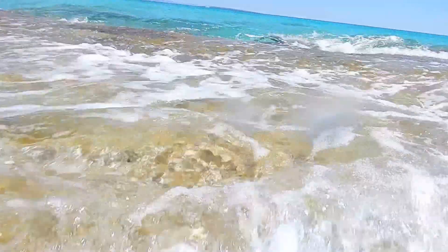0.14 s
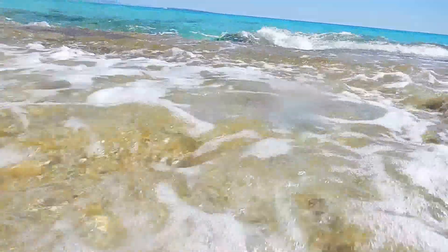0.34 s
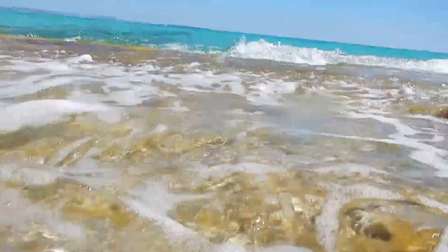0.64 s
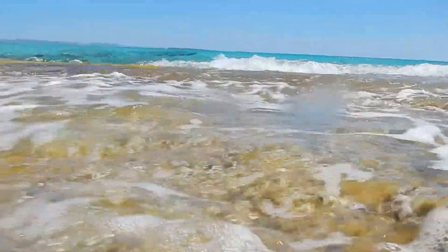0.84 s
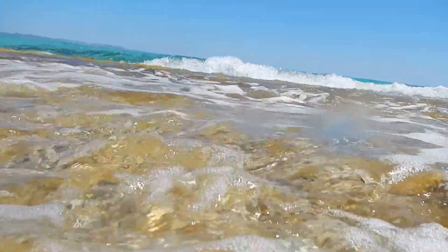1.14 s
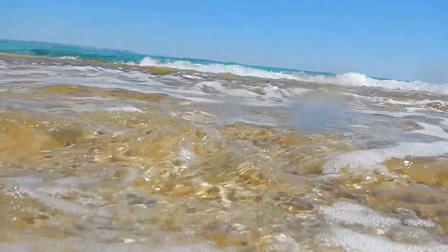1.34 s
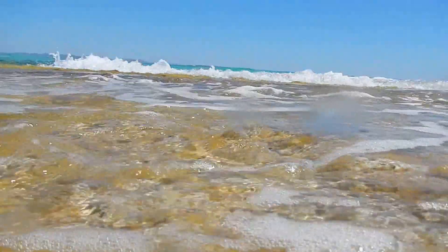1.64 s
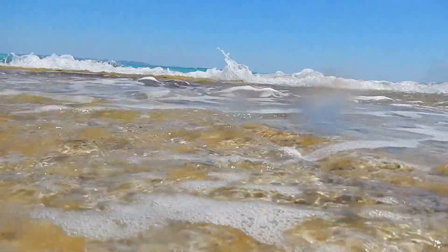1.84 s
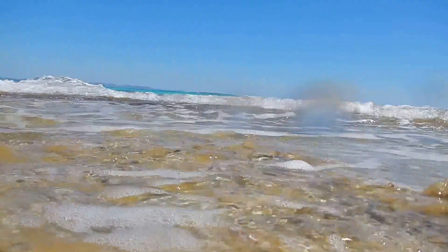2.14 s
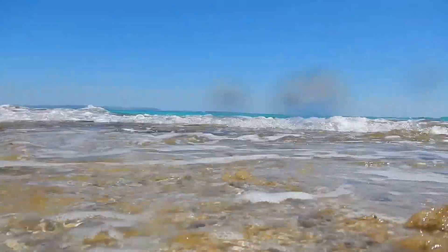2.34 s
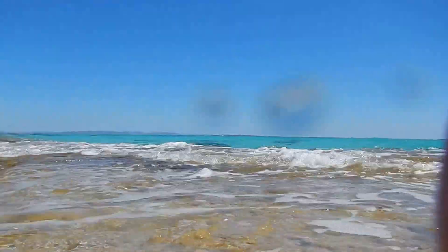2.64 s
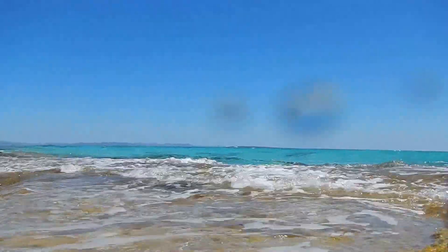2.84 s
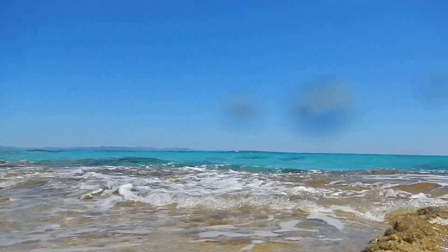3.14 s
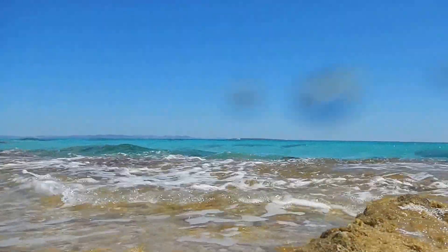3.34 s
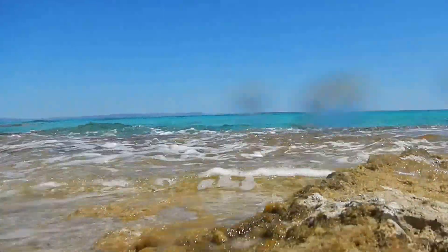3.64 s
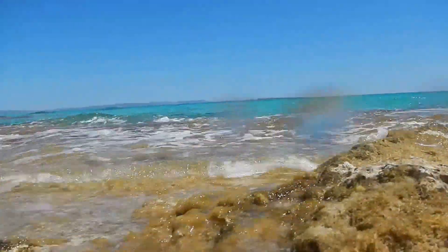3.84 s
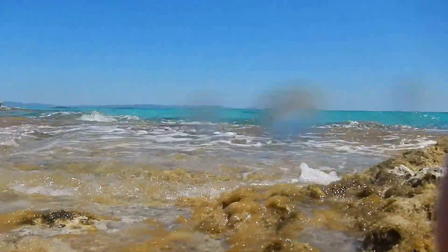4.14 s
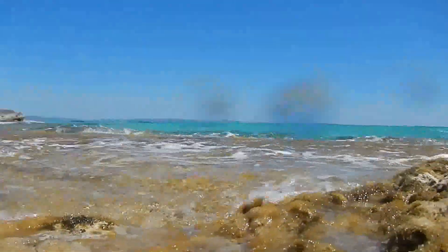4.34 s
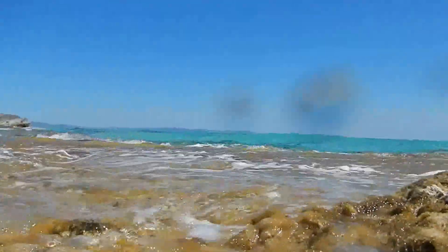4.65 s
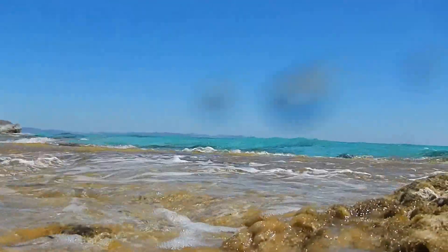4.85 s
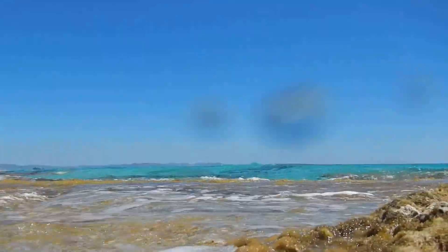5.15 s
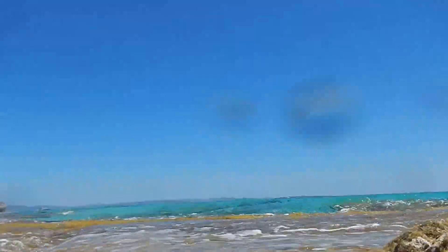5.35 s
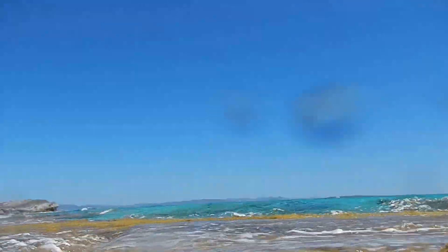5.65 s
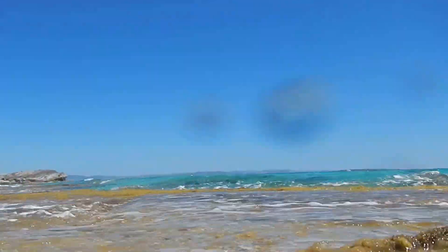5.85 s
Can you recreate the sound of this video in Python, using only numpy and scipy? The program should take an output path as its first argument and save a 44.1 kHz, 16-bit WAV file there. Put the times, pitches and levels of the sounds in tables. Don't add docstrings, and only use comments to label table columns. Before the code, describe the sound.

Small waves wash over a shallow rock shelf, heard from inside a waterproof case that makes everything hollow and boxy, ringing near 1 kHz. Foam fizzes only faintly. Fingers tap and slip on the shell, with a loud cluster near three seconds and another around five. Water plops and gurgles most between 3.8 and 4.9 seconds, while wind rumbles unevenly left and right. The sea dips after loud handling, then swells back.

```python
import sys
import numpy as np
from scipy import signal
from scipy.fft import rfft, irfft, next_fast_len
from scipy.io import wavfile
from scipy.ndimage import uniform_filter1d, map_coordinates

SR = 44100
rng = np.random.default_rng(int(sys.argv[2]) if len(sys.argv) > 2 else 0)


def gain_from_db(level_db):
    decades = np.asarray(level_db, float) / 20
    return 10 ** decades


def output_pcm(signal):
    pcm = np.clip(np.atleast_2d(signal).T, -1, 1) * 32767
    wavfile.write(sys.argv[1], SR, np.round(pcm).astype(np.int16))


N = 265129

# frequency in Hz, level in dB per Hz.
CASE_AIR = [(90, -45), (150, -13), (365, -12), (550, -10), (710, -4), (860, -2), (965, 3), (1100, -4),
            (1490, -20), (1660, -18), (2080, -30.5), (2310, -27.5), (3000, -45.5), (4650, -80.5),
            (9000, -110)]


def unit(x):
    return x / np.sqrt(np.mean(x ** 2) + 1e-20)


def along(points, hz):
    f, v = np.transpose(points)
    return np.interp(np.log(hz + 1), np.log(f + 1), v)


def curves(rows):
    s, *columns = np.transpose(rows)
    return np.array([np.interp(np.arange(N) / SR, s, c) for c in columns])


def wobble(rate, channels=1):
    at = np.arange(N) * rate / SR
    return np.array([map_coordinates(k, [at]) for k in rng.standard_normal((channels, 800))])


def bumps(rows):
    out = np.zeros((len(rows[0]) - 2, N))
    for s, half, *values in rows:
        at = np.arange(max(round((s - half) * SR), 0), min(round((s + half) * SR), N))
        out[:, at] += np.outer(values, np.cos(np.pi / 2 * (at / SR - s) / half) ** 2)
    return out


def window(s):
    start = round(s * SR)
    span = slice(start, min(start + SR // 6, N))
    return span, np.arange(span.start, span.stop) / SR - s


def coloured(x, spectrum, turn=0):
    m = 2 * next_fast_len(N // 2 + 8192)
    hz = np.fft.rfftfreq(m, 1 / SR)
    cepstrum = irfft(np.log(gain_from_db(along(spectrum, hz)) + 1e-7), m)
    cepstrum[1:m // 2] *= 2
    cepstrum[m // 2 + 1:] = 0
    log_response = rfft(cepstrum)
    response = unit(np.exp(log_response.real)) * np.exp(1j * log_response.imag)
    phase = turn(hz) if turn else 0
    return irfft(rfft(x, m) * response * np.exp(1j * phase), m)[..., :N]


def patchy(depth_db):
    z = signal.stft(rng.standard_normal((2, N)), nperseg=256)[2]
    field = uniform_filter1d(rng.standard_normal(z.shape[1:]), size=4, axis=0)
    field = uniform_filter1d(field, size=10, axis=1)
    noise = signal.istft(z * gain_from_db(depth_db * unit(field)), nperseg=256)[1]
    return unit(noise[:, :N])


def pops(rate, spread_db):
    draw = rng.random((2, 3, N))
    bursts = draw[:, 0] < rate / SR
    direction = np.sign(draw[:, 1] - .5)
    size = gain_from_db(-spread_db * np.log(draw[:, 2] + 0.0092))
    return unit(bursts * direction * size)


def ports(pair):
    # frequency in Hz, left-right likeness (1 is identical).
    likeness = [(200, 0.49), (400, 0.14), (700, 0.69), (1000, 0.77), (1500, 0.59), (2300, 0.51),
                (3000, 0.23), (6000, 0.14)]
    m = next_fast_len(N)
    turn = np.arccos(np.clip(along(likeness, np.fft.rfftfreq(m, 1 / SR)), -1, 1)) / 2
    mid, side = irfft(rfft(pair, m) * [np.cos(turn), np.sin(turn)], m)[:, :N]
    return np.array([mid + side, mid - side])


def right_first(lag_s):
    return lambda hz: np.outer([-.5, .5], 2 * np.pi * hz * lag_s)


def gain():
    # start in seconds, level the gain falls to in dB.
    ducks = [(0, -13), (0.751, -13.5), (0.818, -28.5), (1.329, -29), (2.872, -13), (2.998, -12),
             (3.14, -15.5), (3.39, -15), (4.1, -8), (4.713, -3.5), (4.929, -16.5), (5.05, -19), (5.14, -19),
             (5.72, -9)]
    climb_db_per_s, fall_s = 12.5, 0.021
    s, low_db = np.transpose(ducks)
    ends = np.append(s[1:], N / SR)
    high_db = low_db + climb_db_per_s * (ends - s)
    times = np.ravel([s + fall_s, ends], "F")
    return gain_from_db(np.interp(np.arange(N) / SR, times, np.ravel([low_db, high_db], "F")))


def sea():
    # time in seconds, wash level in dB, left over right in dB.
    waves = [(0, -15.5, -0.5), (.4, -11, 1.5), (.62, -12.5, 1), (.75, -7.5, 1.5), (.9, -12.5, 2.5),
             (1.6, -14, 4), (2.1, -14.5, 1.5), (2.7, -14.5, 4.5), (3.1, -13.5, 0.5), (3.4, -19.5, 2),
             (3.7, -17.5, 2.5), (4, -15, 1.5), (4.3, -14, 2.5), (4.85, -16.5, 1), (5.1, -10.5, -2.5),
             (5.4, -17, 0), (5.75, -14.5, 1.5), (6.01, -20, 2)]
    # centre in seconds, half length in seconds, foam swell in dB, gurgle swell in dB.
    surges = [
        (.45, 0.33, 4, -7.5),
        (.74, 0.1, -3.5, 1),
        (1.2, 0.29, 3.5, -4.5),
        (2.1, 0.66, 5.5, -5),
        (2.6, 0.92, 0.5, -1.5),
        (3.75, 0.63, 3.5, 14),
        (4.2, 0.39, 0.5, 8),
        (4.95, 0.4, 4, 5.5),
        (5.85, 0.34, 4, -2.5),
    ]
    # frequency in Hz, level in dB per Hz.
    gurgle_colour = [(200, -23.5), (380, -28), (520, -8), (680, 6.5), (800, 4.5), (950, -24), (2000, -70),
                     (5000, -130)]
    # frequency in Hz, level in dB per Hz.
    foam_colour = [(1500, -20.5), (2500, 11.5), (3000, 2.5), (3600, 3), (4400, -9), (6000, -16.5),
                   (9000, -24), (15000, -37)]
    # frequency in Hz, lead of the left in radians.
    left_lead = [(300, 0.28), (550, 0.3), (1000, 0.38), (1400, 0.42), (2100, -1), (2700, -1.2), (3300, -1),
                 (4500, -6.5)]
    foam_db, foam_fades_db_per_s, gurgle_db = -32.5, 0.96, -14

    def lead(hz):
        return np.outer([.5, -.5], along(left_lead, hz))

    wash_db, pan_db = curves(waves)
    foam_swell_db, hollow_db = bumps(surges)
    fizz_db = wash_db + foam_db - foam_fades_db_per_s * np.arange(N) / SR + foam_swell_db
    slosh_db = 0.51 * wobble(7.6) + 0.53 * wobble(30) + slaps()
    wash = coloured(ports(patchy(1.8) + 0.25 * pops(300, 3.3)), CASE_AIR, lead)
    gurgle = coloured(ports(patchy(1.9) + .5 * pops(150, 2.2)), gurgle_colour, lead)
    fizz = coloured(ports(patchy(2.6) + 0.31 * pops(900, 2.2)), foam_colour, lead)
    water = unit(wash) + gain_from_db(gurgle_db + hollow_db) * unit(gurgle)
    water = gain_from_db(wash_db + slosh_db - 2.5) * water
    fizz = gain_from_db(fizz_db + 0.28 * slosh_db + 0.83 * wobble(24)) * unit(fizz)
    return gain_from_db(np.outer([.5, -.5], pan_db)) * (water + fizz)


def whine():
    tone = np.sin(2 * np.pi * 14835 * np.arange(N) / SR)
    return gain_from_db([[-59], [-65]]) * gain_from_db(.8 * wobble(15)) * tone


def breeze():
    return gain_from_db([[-32], [-26.5]] + 3.5 * wobble(9, channels=2))


def wind(steady):
    # centre in seconds, half length in seconds, left level in dB, right level in dB.
    gusts = [(0.35, 0.09, -43, -35), (0.546, 0.022, -49, -46), (0.733, 0.057, -37, -19),
             (1.06, 0.37, -46.5, -62), (1.54, .12, -43.5, -51), (1.785, 0.026, -44, -52),
             (1.917, 0.034, -48, -37.5), (2.077, .09, -37.5, -54), (2.304, 0.058, -32.5, -38),
             (2.632, 0.2, -48, -29), (2.818, 0.22, -24, -20.5), (3.052, 0.14, -24, -30),
             (3.348, 0.36, -60, -44), (3.603, 0.13, -50, -33.5), (3.797, 0.063, -47.5, -32),
             (3.998, 0.07, -36, -35), (4.115, 0.065, -23, -31), (4.251, 0.1, -20, -33),
             (4.418, 0.12, -19, -27), (4.596, 0.073, -20, -46), (4.768, 0.05, -34, -43.5),
             (4.883, 0.062, -17.5, -36), (5.101, 0.19, -40, -32), (5.504, 0.17, -30, -37.5),
             (5.695, 0.14, -30.5, -28.5), (5.839, 0.045, -22.5, -19), (5.992, 0.18, -32, -23.5)]
    # frequency in Hz, level in dB per Hz.
    rumble_colour = [(15, -4.5), (40, -4), (110, 4), (220, -8.5), (450, -12), (900, -50.5), (2000, -85.5),
                     (5000, -130)]
    # frequency in Hz, level in dB per Hz.
    hiss_colour = [(1500, -41), (4000, -1), (12000, -9), (16000, -23)]
    hiss_db = -53
    lumps = gain_from_db(2.3 * wobble(25, channels=2))
    air = rng.standard_normal((2, N))
    flow = steady + bumps([(s, half, *gain_from_db(db)) for s, half, *db in gusts])
    rumble = unit(lumps * coloured(air - 0.18 * air[::-1], rumble_colour))
    hiss = unit(lumps * coloured(air, hiss_colour))
    return flow * (rumble + gain_from_db(hiss_db) * hiss)


def taps():
    # time in seconds, peak in dB, air ring in dB, nail snap in dB, left over right in dB.
    nail_taps = [(.0137, -15, -9.5, -33.5, 5.5), (.479, -14, -11, -35, 2.5), (.7598, -10.5, 2.5, -35, 5),
                 (.8146, -9.5, 2, -26, -4.5), (1.3316, -32.5, -3.5, -9, -7.5), (1.9607, -36, 0, -20, -1.5),
                 (2.034, -33, -0.5, -25, 3), (2.191, -39.5, 9.5, -13.5, 0.5), (2.2245, -8.5, -5, -37.5, 5),
                 (2.3281, -26, 4.5, -21, 7), (2.484, -22.5, 5.5, -40, -2.5), (2.505, -38, 3.5, -7.5, 3),
                 (2.7077, -30.5, 4.5, -28.5, 5.5), (2.9446, -12, -1.5, -33.5, 3),
                 (3.145, -9, -2, -24, -2.5), (3.3917, -9, -6.5, -26, 0.5), (4.1256, -28.5, 3, -20, 7),
                 (4.4624, -14, -2.5, -21, 0), (4.5405, -31, 0.5, -18.5, 1.5),
                 (4.732, -24.5, 8.5, -17.5, -0.5), (4.9175, -22, 2.5, -24, -4), (4.9225, -20, 6, -23.5, -4),
                 (4.9297, -15.5, 2.5, -31.5, -6.5), (5.0066, -11, 2, -32, -4.5), (5.0374, -11, 3.5, -32, 0),
                 (5.7112, -21, 5.5, -30.5, -3.5)]
    # time in seconds, peak in dB, air ring in dB, left over right in dB.
    tip_taps = [(1.5008, -34, 13, -2), (2.294, -21, 9.5, 1), (2.4701, -11.5, -1, 1),
                (2.5975, -6.5, -8, 4.5), (2.7296, -24.5, 15.5, -0.5), (4.889, -9.5, -5.5, 1),
                (5.0105, -24, 10.5, -3), (5.0551, -14.5, 3.5, -4), (5.0632, -16, 3, 8.5),
                (5.0749, -8.5, -8.5, -1), (5.0975, -16, -9.5, -3), (5.108, -17.5, 2.5, 4),
                (5.1349, -14.5, -6, -6), (5.6533, -15.5, 0, -2.5), (5.7236, -25.5, 2.5, 6.5)]
    # time in seconds, peak in dB, air ring in dB, left over right in dB.
    skin_catches = [(2.2908, -20, -6, 0), (2.4728, -17.5, 2, 3), (2.478, -17, 1, 3.5),
                    (2.592, -18.5, -3, -1.5), (2.8718, -10.5, -19, 2), (2.8737, -8.5, -19.5, 1.5),
                    (2.8792, -3.5, -19.5, -1.5), (2.889, -11.5, -19, -0.5), (2.9114, -11.5, -18, 4),
                    (2.9140, -6.5, -15.5, 4), (2.9204, -12, -16, 3), (2.9228, -13, -17.5, 2.5),
                    (3.0654, -20, -1.5, 1.5), (3.1874, -23.5, -0.5, -1), (5.0401, -13, 2, -0.5),
                    (5.0656, -16.5, -4, 0), (5.0849, -16.5, -8, -2.5), (5.1041, -16.5, -7.5, -2.5),
                    (5.119, -23, 1, -1.5), (5.146, -23, 2, -0.5), (5.6559, -17.5, -0.5, 2.5)]
    air_hz = [
        [1047],
        [977],
    ]
    tip_snap_db, ring_t60_s = -51, 0.038
    crack_hz, crack_db, crack_t60_s, crack_rise_s = 1800, 0.5, 0.0073, .0003
    shell, air, snap, ring, nails = np.zeros((5, 2, N))
    t = np.arange(2000) / SR
    ring_rise = 1 - np.exp(-t / 0.0016)
    crack = gain_from_db(crack_db - 60 * t / crack_t60_s) * (1 - np.exp(-t / crack_rise_s)) ** 2
    crack = crack * np.sin(2 * np.pi * crack_hz * t)
    strikes = [(*row, True) for row in nail_taps]
    for s, db, ring_db, pan_db in list(tip_taps) + list(skin_catches):
        strikes.append((s, db, ring_db, tip_snap_db, pan_db, False))
    for s, db, ring_db, snap_db, pan_db, is_nail in strikes:
        chatter = rng.standard_normal((3, len(t)))
        sides = gain_from_db([[db + pan_db / 2], [db - pan_db / 2]])
        start = round(s * SR)
        now = slice(start, start + len(t))
        rattle = 0.13 * (chatter[0] + .5 * chatter[1:]) * gain_from_db(-60 * t / 0.012)
        blow = sides * ((t == 0) + rattle)
        shell[:, now] += gain_from_db(11.5) * blow
        air[:, now] += gain_from_db(ring_db + 12.5) * blow
        snap[:, now] += gain_from_db(snap_db + 16.0) * blow
        detuned_hz = np.multiply(air_hz, 1 + 0.023 * chatter[1:, :1])
        swing = np.sin(2 * np.pi * detuned_hz * t)
        ring[:, now] += gain_from_db(ring_db + 5.5 - 60 * t / ring_t60_s) * ring_rise * sides * swing
        if is_nail:
            nails[:, now] += gain_from_db(14.5) * blow
            ring[:, now] += sides * crack
    return shell, air, snap, ring, nails


def fingers():
    # frequency in Hz, level in dB per Hz.
    shell_colour = [(300, -66), (800, -25.5), (1250, 1), (1630, 8), (2000, -5), (2400, -4.5), (3030, -24.5),
                    (3580, -24), (4400, -55), (8000, -89), (12000, -120)]
    # frequency in Hz, level in dB per Hz.
    snap_colour = [(2000, -28), (3800, 5.5), (4800, -3), (6000, -7), (8000, -18), (11000, -15.5),
                   (16000, -31.5)]
    shell, air, snap, ring, nails = taps()
    slip_shell, slip_air, slip_snap = slips()
    shell, air, snap = shell + slip_shell, air + slip_air, snap + slip_snap
    air = np.where(on_lid(), 7 * np.gradient(air, axis=1), air)
    lag = right_first(0.00013)
    body = coloured(shell, shell_colour, lag) + coloured(air, CASE_AIR, lag)
    return body + coloured(snap, snap_colour, lag) + ring + lid(shell + nails)


def plops():
    # time in seconds, peak in dB, pitch in Hz, left over right in dB.
    single_plops = [(0.15, -20, 904, 3), (0.271, -10, 952, 3.0), (0.41, -5.5, 975, 4.5),
                    (0.427, -8, 992, 3.5), (0.465, -8.5, 947, 2), (0.526, -9.5, 1000, 3.0),
                    (0.541, -14, 974, 2), (0.624, -12, 938, 4), (0.691, -8, 902, 6), (0.724, -11, 1010, 3),
                    (0.73, -19, 960, 5), (0.742, -8.5, 1043, 5), (2.621, -14.5, 1020, -1),
                    (2.628, -15, 943, 0), (2.644, -19, 1038, -1.0), (2.673, -16, 950, 9),
                    (3.125, -15, 966, 5), (3.189, -17.5, 1010, 1), (3.283, -16.5, 1007, 0),
                    (4.697, -11.5, 1010, 4), (4.71, -6.5, 977, 4), (4.784, -7.5, 990, 5.5),
                    (4.804, -13.5, 794, 0), (4.857, -15, 835, 3.5), (4.864, -11.5, 1016, 5),
                    (4.903, -7.5, 751, -1.0), (4.91, -10, 976, -6), (5.721, -7.5, 935, -4)]
    # time in seconds, peak in dB, pitch in Hz, left over right in dB.
    surge_plops = [(3.838, -15, 920, 6.0), (3.957, -13.5, 993, 5.0), (3.983, -14, 955, 4.0),
                   (4.008, -12, 967, 4.5), (4.037, -15.5, 910, 4.0), (4.098, -10.5, 913, 4.5),
                   (4.174, -14, 874, 5.5), (4.227, -12, 773, 4.5), (4.299, -12, 845, 4.0),
                   (4.359, -5, 990, 4.5), (4.386, -8, 860, 5.0), (4.533, -9, 994, 5.0),
                   (4.583, -12, 994, 5.0), (4.606, -9.5, 870, 2.5), (4.642, -10.5, 978, 4.5),
                   (4.681, -10, 740, 2.5)]
    # time in seconds, peak in dB, pitch in Hz, left over right in dB.
    late_plops = [(5.796, -18.5, 987, 3.0), (5.827, -15, 914, 3.0), (5.905, -17.5, 990, 2.0),
                  (5.94, -17, 934, 2.5)]
    level_db, rise_s, t60_s = 2, 0.002, 0.043
    out = np.zeros((2, N))
    for s, db, hz, pan_db in list(single_plops) + list(surge_plops) + list(late_plops):
        span, t = window(s)
        swell = gain_from_db(db + level_db - 60 * t / t60_s) * (1 - np.exp(-np.abs(t) / rise_s))
        swing = np.sin(2 * np.pi * hz * t + [[-.3], [.3]])
        out[:, span] += gain_from_db([[pan_db / 2], [-pan_db / 2]]) * swell * swing
    return out


def slaps():
    # time in seconds, swell in dB, length in seconds.
    rock_slaps = [(0.27, 3.5, 0.0049), (0.428, 5, 0.0043), (0.464, 5, 0.0036), (0.528, 3, 0.015),
                  (0.599, 2.5, 0.0066), (0.903, 8, 0.0052), (1.295, 6.5, 0.0045), (1.994, 3.5, 0.036),
                  (3.295, -4, 0.0023), (4.088, 3, 0.013), (4.286, 2, 0.016), (4.382, 1.5, 0.055),
                  (4.525, 2.5, 0.021), (4.632, -1.5, 0.0059), (4.787, -0.5, 0.0057), (5.195, 6.5, 0.0035),
                  (5.839, -2, 0.0046), (5.921, 2, 0.016)]
    swell_db = np.zeros(N)
    for s, db, length in rock_slaps:
        span, t = window(s - length / 2)
        age = np.abs(t / length)
        swell_db[span] += db * age * np.exp(1 - age)
    return swell_db


def slips():
    # start in seconds, length in seconds, level in dB, air ring in dB, nail snap in dB.
    strokes = [(0.697, 0.054, -31.5, 9, -21.5), (2.301, 0.011, -31.5, 15, -43.5),
               (2.38, 0.018, -37, 9, -53), (2.457, 0.039, -30, -2, -42.5), (2.602, 0.088, -31, 4.5, -38.5),
               (2.865, 0.033, -16, -24, -30.5), (2.906, 0.025, -14, -8.5, -36),
               (2.999, 0.09, -33.5, 1, -35), (3.112, 0.052, -29.5, -5, -30.5),
               (3.173, 0.034, -31.5, 3.5, -32), (3.258, 0.044, -39.5, 2.5, -42.5),
               (4.895, 0.04, -35, 18, -20), (5.058, 0.054, -30.5, 7.5, -53.5),
               (5.137, 0.077, -40, 7.5, -46), (5.71, 0.023, -30.5, 9, -31.5)]
    shell, air, snap = np.zeros((3, 2, N))
    grip = ports(pops(1200, 2.6) + .5 * patchy(3.1)) * gain_from_db(2.4 * wobble(120))
    for s, length, db, ring_db, snap_db in strokes:
        now, t = window(s)
        fade = np.clip(np.minimum(t / 0.0065, (length - t) / 0.0093), 0, 1)
        stroke = fade * grip[:, now]
        shell[:, now] += gain_from_db(db) * stroke
        air[:, now] += gain_from_db(db + ring_db) * stroke
        snap[:, now] += gain_from_db(db + snap_db) * stroke
    return shell, air, snap


def pushes():
    # time in seconds, left level in dB, right level in dB, pitch in Hz,
    # direction (-1 when the case rocks and the ports move opposite).
    soft_pushes = [(0.701, -14, -6.5, 51.84, -1), (0.736, -8, -6.5, 406, 1), (1.049, -30, -38, 109, 1),
                   (1.292, -44, -15, 40, -1), (1.7, -26, -19, 165, -1), (1.3304, -10, 4, 435, -1),
                   (1.425, -35, -21.5, 144, -1), (1.77, -41, -32, 216, 1), (1.915, -12.5, -21, 620, 1),
                   (2.789, -9, -30, 144, -1), (3.1, -5.5, -24, 152, -1), (2.82, -11, -12, 141.7, -1),
                   (2.852, -16, -13, 95, 1), (2.873, -22, -10.5, 442, 1), (3.064, -14, -16.5, 190, 1),
                   (3.564, -27, -24, 115, -1), (4.1255, -10.5, -4, 448, 1), (4.46, -16.5, -10, 410, 1),
                   (4.713, -7, 0, 56, -1), (4.738, -17, -8.5, 40.1, -1), (5.462, -21, -36, 101, 1),
                   (5.846, -16.5, -12, 106, 1)]
    out = np.zeros((2, N))
    for s, left_db, right_db, hz, together in soft_pushes:
        span, t = window(s - .02)
        cycles = (t - .02) * hz - .8
        cycles = cycles * np.exp(-.25 * np.clip(cycles, -2, 1.2))
        shape = np.sin(2 * np.pi * cycles + .5) * np.exp(-(cycles / .5) ** 2)
        shape = shape * np.clip((.14 - t) / .03, 0, 1)
        out[:, span] += gain_from_db([[left_db], [right_db]]) * [[1], [np.sign(together)]] * shape
    return out


def dents():
    # time in seconds, level in dB, half width in seconds, direction.
    bulges = [
        (1.2996, -6, 0.0012, -1),
        (1.3299, -4, 0.00067, 1),
    ]
    out = np.zeros((2, N))
    for s, db, half, direction in bulges:
        out[1] += np.sign(direction) * gain_from_db(db) * np.exp(-((np.arange(N) / SR - s) / half) ** 2)
    return out


def knocks():
    # time in seconds, left level in dB, right level in dB, pitch in Hz.
    palm_knocks = [
        (1.5012, -20.5, -28, 735),
        (2.4692, -18.5, -6.5, 382),
        (4.1255, 0, -9, 587),
        (5.0067, -16, -13.5, 480),
        (5.0626, -22, -5, 480),
        (5.0853, -13, -2.5, 487),
        (5.0965, -24.5, -4.5, 460),
        (5.107, -16.5, -8.5, 438),
        (5.1345, -16.5, -5.5, 540),
    ]
    t60_s, rise_s = 0.029, 0.00061
    out = np.zeros((2, N))
    for s, left_db, right_db, hz in palm_knocks:
        span, t = window(s)
        swell = gain_from_db([[left_db], [right_db]] - 60 * t / t60_s) * (1 - np.exp(-t / rise_s))
        out[:, span] += swell * np.sin(2 * np.pi * hz * t)
    return out


def on_lid():
    t = np.arange(N) / SR
    return (t > 2.15) * (t < 3.45)


def lid(blows):
    # frequency in Hz, level in dB per Hz.
    lid_colour = [(1200, -47.5), (2000, -5), (2400, 4.5), (3000, -9), (3500, -10.5), (4500, -32.5),
                  (7000, -34.5), (12000, -54)]
    ringing = coloured(blows.mean(axis=0) * on_lid(), lid_colour, right_first(0.00017))
    return gain_from_db([[-7.5], [-12.5]]) * ringing


def gated(x):
    gate_db, ragged_db = -102, 4.5
    gate_hz, whine_low_hz, whine_high_hz = 4000, 14600, 15100
    hz, _, z = signal.stft(x, SR, nperseg=1024)
    power = (np.abs(z[:, :-1]).reshape(2, 256, 2, -1) ** 2).mean(axis=2)
    ragged = unit(uniform_filter1d(rng.standard_normal(power.shape[1:]), size=5, axis=1))
    loud = uniform_filter1d(power, size=3, axis=2) > gain_from_db(gate_db + ragged_db * ragged) ** 2
    keep = np.pad(np.repeat(loud, 2, axis=1), ((0, 0), (0, 1), (0, 0)))
    free = (hz < gate_hz) | ((hz > whine_low_hz) & (hz < whine_high_hz))
    return signal.istft(z * (keep | free[:, None]), SR, nperseg=1024)[1][:, :N]


def scene():
    g = gain()
    steady = g * (sea() + whine()) + wind(g * breeze())
    return steady + fingers() + plops() + pushes() + dents() + knocks()


def band_limit(x):
    return signal.sosfilt(signal.butter(12, 16280, fs=SR, output="sos"), x)


def record(dry):
    clipped = dry / (1 + np.abs(dry / .99) ** 8) ** (1 / 8)
    return band_limit(gated(clipped))


dry = scene()
out = record(dry)
output_pcm(out)
```